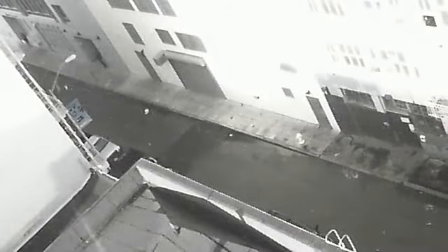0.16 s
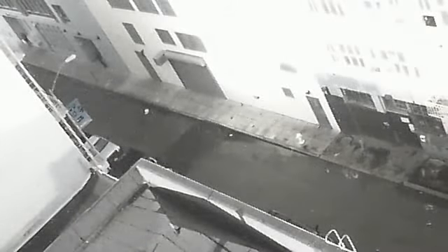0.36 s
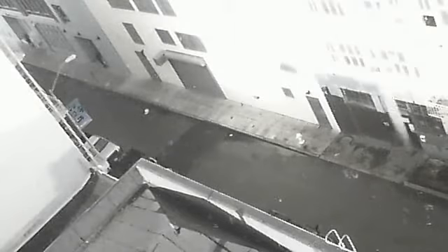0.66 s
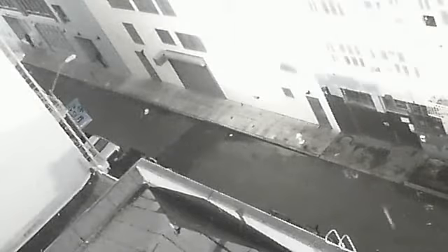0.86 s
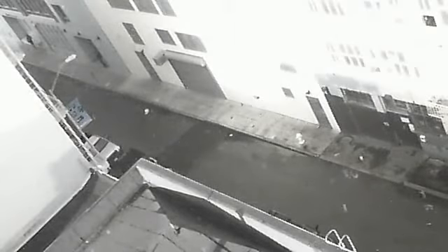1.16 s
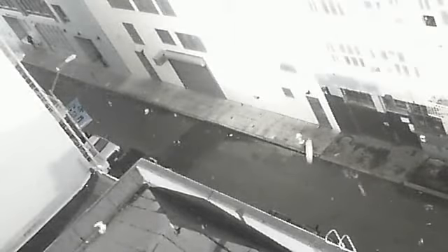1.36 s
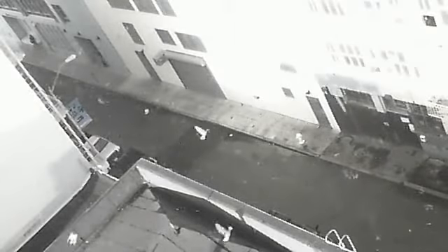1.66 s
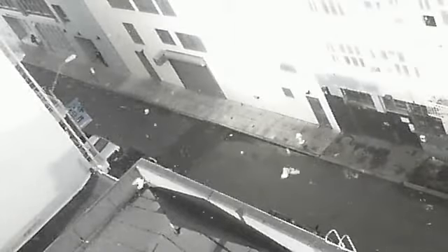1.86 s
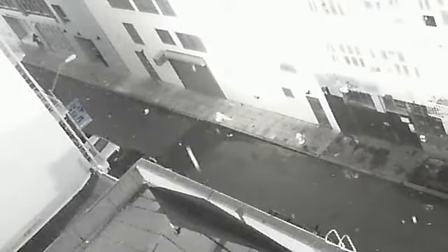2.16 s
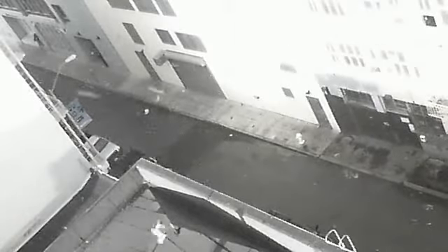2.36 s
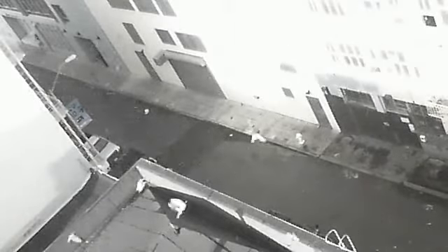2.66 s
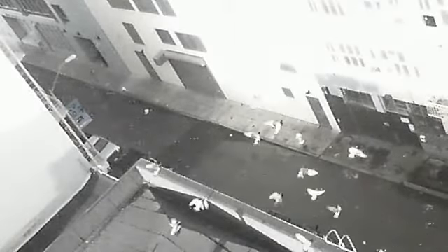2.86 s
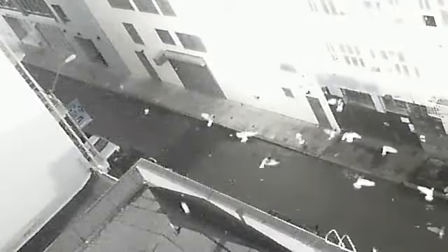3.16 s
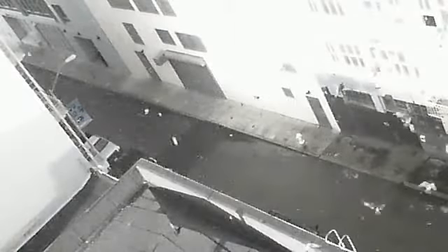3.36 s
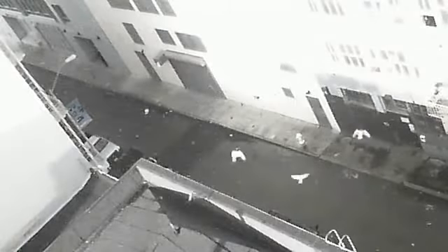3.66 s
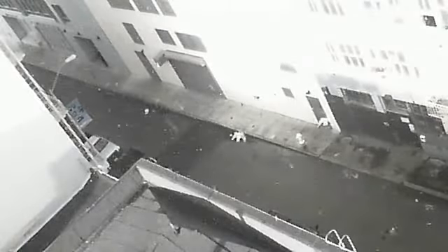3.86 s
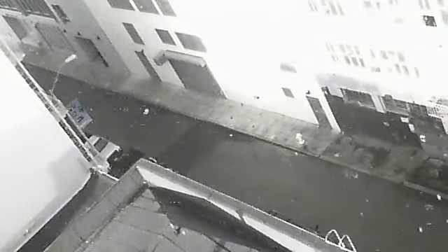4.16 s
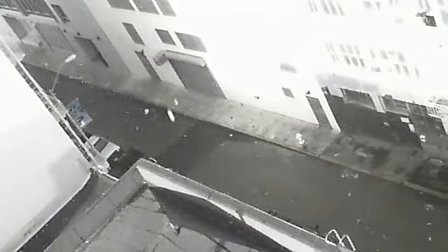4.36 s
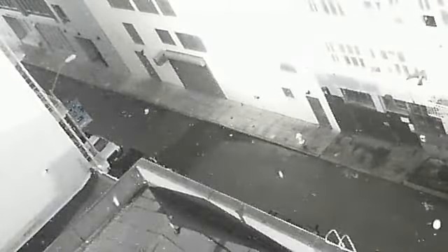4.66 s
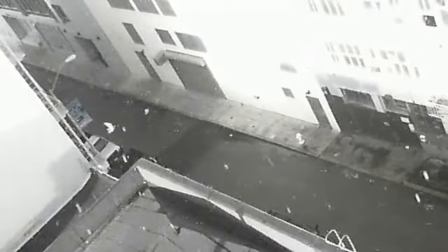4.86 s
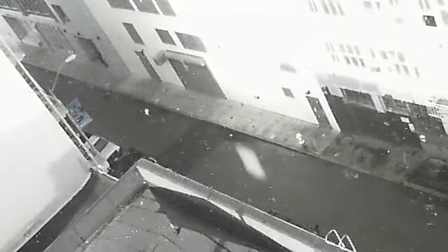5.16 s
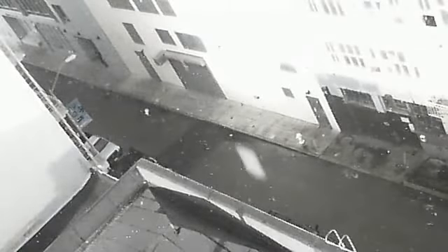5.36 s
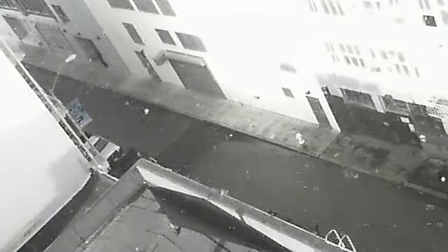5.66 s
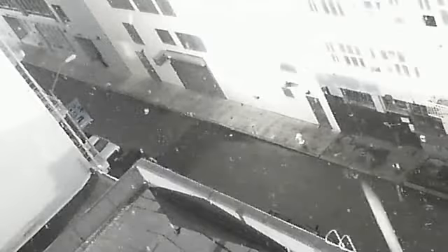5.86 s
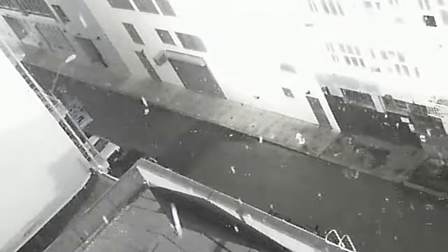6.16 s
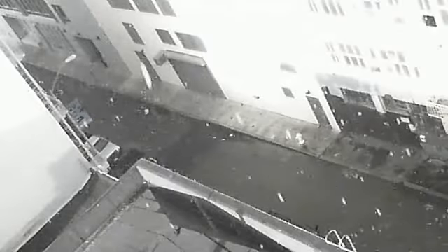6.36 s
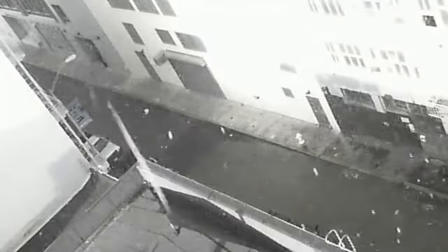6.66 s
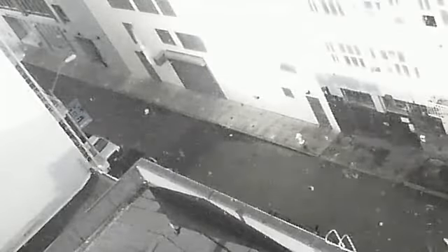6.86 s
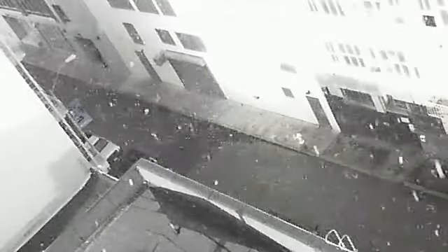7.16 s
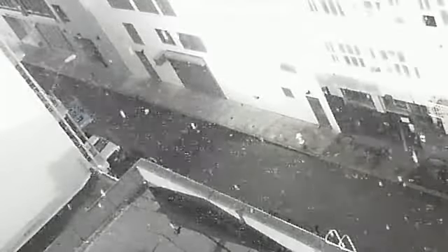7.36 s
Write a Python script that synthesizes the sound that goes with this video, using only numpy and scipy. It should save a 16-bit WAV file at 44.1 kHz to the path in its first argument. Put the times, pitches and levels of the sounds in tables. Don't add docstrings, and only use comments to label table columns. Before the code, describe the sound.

Hail hisses over a street and flat roof while close stones crack, tick and tap on a ledge, thickening as wind buffets the microphone.

```python
import sys
import numpy as np
from scipy import signal
from scipy.fft import rfft, irfft, dct, next_fast_len
from scipy.io import wavfile
from scipy.ndimage import uniform_filter1d

SR = 44100
rng = np.random.default_rng(int(sys.argv[2]) if len(sys.argv) > 2 else 0)


def volts(x):
    e = np.asarray(x, float) / 20
    return 10 ** e


def to_wav(sig):
    pcm = np.clip(np.atleast_2d(sig), -1, 1) * 32767
    pcm = np.round(pcm).astype(np.int16)
    wavfile.write(sys.argv[1], SR, pcm.T)


N = 331191
SECONDS = np.arange(N) / SR
SIZE = next_fast_len(N)
HZ = np.arange(1, SIZE // 2 + 2) * SR / SIZE
BANDS = np.geomspace(180, 10000, 18)
HEAVY_MEAN_DB = -36
SNAP_T60 = .0035
CUTOFF_HZ = 10340


def rms_one(x):
    return x / np.sqrt(np.mean(x ** 2) + 1e-20)


def noise_spectrum(points):
    hz, level_db = np.transpose(points)
    colour_db = np.interp(np.log(HZ), np.log(hz), level_db, left=-90, right=-90)
    return rfft(rng.standard_normal(SIZE)) * volts(colour_db)


def noise_bands(points):
    spectrum = noise_spectrum(points)
    place = np.interp(np.log(HZ), np.log(BANDS), np.arange(len(BANDS)))
    weights = (np.clip(1 - abs(place - k), 0, 1) for k in range(len(BANDS)))
    return np.array([irfft(spectrum * weight, SIZE)[:N] for weight in weights])


def band_rms(bands, low_hz, high_hz):
    return np.std(bands[(BANDS > low_hz) & (BANDS < high_hz)].sum(axis=0))


def drift(rate, count):
    pole = np.exp(-80 * np.pi * rate / SR)
    chance = rng.standard_normal((count, N // 40 + 2002))
    slow = signal.lfilter([1], [1, -2 * pole, pole * pole], chance)[:, 2000:]
    return np.array([np.interp(np.arange(N) / 40, np.arange(len(row)), rms_one(row)) for row in slow])


def evened(x, span_s):
    power = uniform_filter1d(x ** 2, int(span_s * SR))
    return rms_one(x / np.sqrt(power + 0.16 * np.mean(x ** 2)))


def shatter(bands, starts_s, band_db, t60, rise_s, plateau):
    out = np.zeros(N + 4000)
    for s, gains, ring_s in zip(starts_s, volts(band_db), np.clip(t60, .008, .15)):
        at = max(round((s - rise_s / 2) * SR), 0)
        age = np.arange(int(ring_s * 25000)) / SR
        decay = volts(-60 * np.maximum(age / ring_s - plateau, 0))
        shape = np.minimum(age / rise_s, 1) * decay
        out[at:at + len(age)] += shape * (gains @ bands[:, at:at + len(age)])
    return out[:N]


def ring_modes(blows, length_s):
    out = np.zeros(N + SR)
    age = np.arange(int(length_s * SR)) / SR
    for s, level_db, hz, t60 in blows:
        swell = 1 - np.exp(-age * hz / 1.5)
        mode = swell * np.sin(2 * np.pi * hz * age)
        out[round(s * SR):][:len(age)] += volts(level_db - 60 * age / t60) * mode
    return out[:N]


def ledge_stones(bands, stones, middle_db, thud_db, snap_db, debris_db, stretch, plateau, uneven_db):
    s, peak_db, hz, t60 = np.transpose(stones)
    octaves = np.log2(BANDS / hz[:, None])
    crack_db = 1.2 - 11 * np.minimum(octaves ** 2, .45)
    lower_db = np.where(BANDS > 2400, middle_db + 11.0, thud_db + 4.5)
    colour_db = np.where(BANDS > 5000, crack_db, lower_db) - 8 * (BANDS < 450)
    colour_db = colour_db + uneven_db * rng.standard_normal(colour_db.shape)
    ring = ring_modes(np.transpose([s, peak_db - 11.0, hz, t60]), length_s=0.056)
    snaps = np.transpose([s + .0006, peak_db + snap_db, hz, SNAP_T60 + 0 * s])
    snap = ring_modes(snaps, length_s=.006)
    debris_level_db = peak_db[:, None] + debris_db + colour_db
    debris = shatter(bands, s, debris_level_db, stretch * t60, rise_s=0.0018, plateau=plateau)
    return snap + ring + debris


# t/s, small stones level/dB, heavy stones level/dB
STORM = [(0, -35.5, -37), (.7, -35, -38), (1.5, -33.4, -38), (2.7, -33.5, -37), (3.4, -32, -37),
         (3.8, -31.5, -36.5), (4.3, -32, -35), (4.9, -31, -34), (5.6, -31, -34.5), (6, -30, -34),
         (6.7, -30, -34), (7.2, -30, -34.5), (7.51, -30.5, -33)]


def storm_db(s, column):
    return np.interp(s, *np.transpose(STORM)[[0, column]])


# f/Hz, level/dB per Hz
HAIL = [(94, -48.5), (160, -11), (357, -10), (656, -1), (980, 1), (1250, -3), (1490, -2.5), (2180, -8.5),
        (3560, -12), (4160, -9), (5310, -10), (6900, -3), (7660, -2.5), (9120, -4.5), (10300, -13),
        (13400, -40), (22000, -120)]


def far_hail(patchy_db, together_db):
    bands = noise_bands(HAIL)
    flicker_db = patchy_db * drift(12.7, count=len(BANDS)) + together_db * drift(9.3, count=1)
    small_db, heavy_db = storm_db(SECONDS, 1), storm_db(SECONDS, 2)
    swing_db = heavy_db - HEAVY_MEAN_DB
    # level/dB, centre/Hz, lower and upper edge/Hz
    surfaces = [(small_db, 6000, 4000, 11000),
                (heavy_db, 1300, 900, 2500),
                (HEAVY_MEAN_DB - 6 + 0.78 * swing_db, 680, 500, 900),
                (HEAVY_MEAN_DB - 9.5 + .7 * swing_db, 350, 200, 500)]
    centres = np.log([350, 680, 1300, 6000])
    level = 0
    for level_db, centre_hz, low_hz, high_hz in surfaces:
        own = np.isclose(centres, np.log(centre_hz)).astype(float)
        share = np.interp(np.log(BANDS), centres, own)[:, None]
        level = level + share * volts(level_db) / band_rms(bands, low_hz, high_hz)
    return (bands * level * volts(flicker_db)).sum(axis=0)


def roof_stones(bands, count, size_db):
    when, size, pitch, ring = rng.random((count, 4)).T
    s = when * (N / SR - .01)
    centre_hz = 700 * (11000 / 700) ** pitch
    colour_db = -12 * np.log2(BANDS / centre_hz[:, None]) ** 2
    level_db = storm_db(s, 1) - 7 - size_db * np.log(1 - .97 * size)
    return shatter(bands, s, level_db[:, None] + colour_db, 0.013 + .025 * ring, rise_s=.005, plateau=.3)


def pings(count, size_db):
    when, size, pitch, ring = rng.random((count, 4)).T
    s = when * N / SR
    hz = 650 * (10000 / 650) ** pitch
    colour_hz, density_db = np.transpose(HAIL)
    colour_db = np.interp(np.log(hz), np.log(colour_hz), density_db)
    level_db = storm_db(s, 1) + colour_db - 2.5 - size_db * np.log(1 - .95 * size)
    return ring_modes(np.transpose([s, level_db, hz, .03 + 0.064 * ring]), length_s=0.024)


def car_roofs(count, centre_hz, growth):
    when, size, pitch, ring = rng.random((count, 4)).T
    s = when * N / SR
    level_db = -43.0 + growth * (storm_db(s, 2) - HEAVY_MEAN_DB) - 3.6 * np.log(1 - .95 * size)
    hz = centre_hz * (.91 + .18 * pitch)
    return ring_modes(np.transpose([s, level_db, hz, 0.091 + 0.066 * ring]), length_s=0.022)


def crackle(count, size_db):
    when, size, pitch = rng.random((count, 3)).T
    s = when ** 0.64 * (N / SR - .01)
    level_db = storm_db(s, 1) + 7.4 - size_db * np.log(1 - .95 * size)
    return ring_modes(np.transpose([s, level_db, 5500 + 4000 * pitch, SNAP_T60 + 0 * s]), length_s=.006)


# t/s, deep push level/dB, flutter level/dB, length/s
EDDIES = [(0.492, -30, -42, 0.055), (0.763, -32.5, -35.5, 0.13), (.906, -32, -44, .05),
          (0.596, -33, -42, .04), (.17, -60, -54, 0.036), (1.078, -40, -46, 0.036), (2.305, -41, -52, .06),
          (4.71, -38, -37, 0.062), (0.965, -50, -36.5, 0.075), (1.04, -31.5, -47, .1),
          (1.39, -32, -60, 0.04), (1.568, -30.5, -55, 0.067), (2.13, -42, -47, 0.089),
          (2.847, -31, -35, 0.078), (3.027, -35, -38.5, 0.059), (3.192, -52, -36, 0.12),
          (3.353, -43, -34.5, 0.055), (3.403, -32, -40, 0.028), (3.485, -33, -35, 0.1),
          (3.617, -23.5, -28, 0.035), (3.95, -37, -36, .07), (4.26, -31, -42, 0.043),
          (3.735, -30, -27.5, 0.024), (3.802, -26.5, -27.5, 0.043), (3.87, -26, -42, .03),
          (6.65, -42, -38, .06), (2.66, -40, -44, .06), (3.72, -40, -34, .02), (3.69, -31, -42, 0.035),
          (4.046, -23, -34, 0.042), (4.095, -45, -32, 0.032), (4.18, -28, -37, 0.045),
          (4.58, -31, -41.5, 0.074), (5.122, -45, -44.5, .08), (5.353, -37, -54, .08),
          (5.672, -48, -39.5, 0.11), (5.92, -40, -50, .05), (6.546, -39, -40, .06),
          (6.763, -33, -37, 0.073), (6.845, -45, -36.5, 0.11), (7.016, -26, -28, .04),
          (7.087, -27, -32, 0.049), (7.13, -31, -34, .05), (6.97, -29, -40, .04), (7.272, -22, -31, 0.049),
          (7.36, -42, -32.5, 0.091), (7.48, -28, -28, 0.056)]


def eddies():
    t, out = np.arange(0, N + 64, 64) / SR, 0
    for s, deep_db, flutter_db, length_s in EDDIES:
        power = volts(2 * np.array([[deep_db], [flutter_db]]))
        out = out + power * np.exp(-(2 * (t - s) / length_s) ** 2)
    return np.array([np.interp(SECONDS, t, row) for row in out])


# t/s, level/dB
WIND = [(0, -52), (.33, -53), (.5, -35), (.95, -38.5), (1.25, -43.5), (1.6, -40), (2.0, -48), (2.5, -43),
        (2.85, -36), (3.7, -36.5), (4.3, -39.5), (4.6, -34.5), (5.1, -37.5), (5.6, -51), (6.1, -42),
        (6.5, -35), (6.9, -36.5), (7.2, -29), ]
# f/Hz, level/dB per Hz
BUFFET = [(6, 1.5), (20, 4.5), (40, 3.5), (60, -11.5), (85, -25.5), (130, -43)]
# f/Hz, level/dB per Hz
FLUTTER = [(40, -41.5), (60, 3.5), (90, -4), (130, -8.5), (180, -25.5), (300, -27)]


def wind(lumpy_db):
    wind_db = np.interp(SECONDS, *np.transpose(WIND))
    flutter_db = -49.5 + 0.41 * (wind_db + 41)
    steady_power = volts(2 * np.array([wind_db, flutter_db]))
    deep_gain, flutter_gain = np.sqrt(steady_power + eddies())
    lumps = volts(lumpy_db * drift(22, count=1)[0])
    deep = evened(irfft(noise_spectrum(BUFFET), SIZE)[:N], span_s=0.045)
    flutter = rms_one(lumps * evened(irfft(noise_spectrum(FLUTTER), SIZE)[:N], span_s=0.042))
    return deep_gain * deep + flutter_gain * flutter


# t/s, peak level/dB, brightest f/Hz, t60/s
SOLID = [(0.052, -15.5, 7800, 0.04), (0.563, -18.5, 8640, 0.065), (2.06, -19, 7530, 0.034),
         (2.513, -22, 7900, 0.065), (3.2738, -17.5, 9700, .049), (3.318, -17, 9600, 0.054),
         (3.666, -18, 7310, 0.043), (3.728, -14, 7350, .05), (5.1607, -12.5, 7200, 0.025),
         (5.2013, -28, 8700, 0.052), (5.5586, -15, 6790, 0.034), (5.654, -11, 7470, 0.025),
         (5.77, -15.5, 7460, 0.033), (5.886, -20, 7680, 0.035), (6.0314, -13, 7900, .03),
         (6.157, -15, 6820, 0.077), (6.1913, -18, 7720, 0.044), (6.273, -15.5, 8800, 0.023),
         (6.3794, -15, 7850, 0.031), (6.4067, -13.5, 9640, 0.031), (6.497, -16.5, 7300, 0.037),
         (6.64, -16, 6040, 0.025), (6.7874, -13.5, 8350, 0.03), (6.8184, -19, 8200, 0.046),
         (7.01, -21, 7450, .04), (7.067, -13.5, 7070, 0.11), (7.104, -14, 8530, 0.035),
         (7.31, -13.5, 7630, 0.021), (7.386, -9, 7900, 0.029), (7.428, -13.5, 8140, 0.055)]


def solid_stones(bands):
    return ledge_stones(bands, SOLID, middle_db=-16.5, thud_db=-3.5, snap_db=-6, debris_db=-14,
                        stretch=1.38, plateau=0.08, uneven_db=0.8)


# t/s, peak level/dB
SNAPS = [(0.657, -10), (2.099, -9.5), (3.605, -12), (3.7288, -9), (4.9854, -17), (5.163, -12),
         (5.2215, -18), (5.7704, -24), (5.8293, -16), (5.9914, -11), (6.1605, -13), (6.192, -10),
         (6.1974, -16), (6.379, -22), (6.4162, -11), (6.7886, -9), (6.856, -13), (6.864, -12), (7.073, -14),
         (7.3831, -14), (.0545, -19), (1.0287, -20), (1.2953, -18), (1.649, -16), (1.9978, -16),
         (3.3155, -13), (3.5343, -15), (4.2225, -20), (4.751, -16), (4.8478, -16.5), (5.2308, -13),
         (5.3227, -18), (5.839, -13), (6.4221, -14), (7.0112, -16), (5.6562, -12)]


def bright_ticks(hz, t60, boost_db):
    s, peak_db = np.transpose(SNAPS)
    pitch = hz * rng.uniform(0.86, 1.15, len(s))
    out = 0
    for ratio, db in ((0.99, 3.5), (0.37, -6), (0.2, -15)):
        ticks = np.transpose([s, peak_db + boost_db + db, ratio * pitch, t60 + 0 * s])
        out = out + ring_modes(ticks, length_s=.006)
    return out


# t/s, level/dB, f/Hz, t60/s
TAPS = [(.109, -30.5, 2550, 0.027), (.4702, -27, 1680, .03), (2.2658, -25.5, 1780, .03),
        (3.5645, -27, 1800, .03), (4.757, -25, 1700, .03), (5.4595, -23, 1600, .03),
        (5.7695, -19.5, 1580, 0.028), (5.7702, -24, 2750, 0.02), (5.911, -23, 1600, .03),
        (6.0322, -15.5, 7660, 0.041), (6.037, -20.5, 1800, 0.022), (6.4068, -20, 1083, 0.037),
        (6.4135, -23, 2300, .03), (6.4168, -16.5, 1470, .025), (6.417, -16, 680, 0.028),
        (6.447, -24, 1500, .06), (6.4665, -20, 990, .04), (6.858, -20, 1310, .03),
        (7.1055, -16, 1413, 0.036), (7.3205, -22, 1500, .03), (4.9845, -21, 1750, 0.028),
        (7.1055, -14, 8520, .04), (6.0335, -18, 9800, .03), (6.031, -22.5, 4090, 0.043),
        (6.788, -18, 1000, .035), (7.3835, -15, 9200, 0.02), (7.384, -20, 7500, .03)]


def hollow_taps():
    return ring_modes(TAPS, length_s=.04)


# t/s, peak level/dB, brightest f/Hz, t60/s
BRITTLE = [(0.11, -16.5, 7140, 0.018), (0.6555, -15.5, 8150, 0.033), (1.6486, -14, 7200, .036),
           (1.7873, -17, 7160, .025), (2.099, -12, 9680, .07), (2.979, -11, 7900, 0.033),
           (3.025, -19.5, 7260, 0.032), (3.534, -17.5, 7500, 0.03), (3.605, -18.5, 7800, 0.037),
           (3.9584, -16, 6300, 0.064), (4.18, -18, 9000, 0.026), (4.211, -16, 9130, 0.094),
           (4.7486, -14.5, 6830, 0.057), (4.874, -12, 9500, 0.091), (4.893, -16, 7150, 0.033),
           (5.2205, -12.5, 7400, 0.028), (5.2844, -23, 6980, 0.029), (5.323, -14.5, 7070, 0.041),
           (5.3547, -19, 7540, .053), (5.5095, -13, 7900, 0.027), (5.8305, -8.5, 7530, 0.031),
           (5.988, -13, 7600, .04), (6.116, -15, 8900, 0.044), (6.3006, -14, 6820, 0.017),
           (6.593, -10, 8200, 0.02), (6.6237, -22, 7120, .019), (6.7057, -12.5, 8920, .035),
           (6.7346, -22, 7450, 0.12), (6.8603, -7, 9000, 0.02), (7.1881, -16, 9050, 0.066)]


def brittle_stones(bands):
    return ledge_stones(bands, BRITTLE, middle_db=-16, thud_db=-14.5, snap_db=-4.5, debris_db=-17,
                        stretch=1.2, plateau=0.17, uneven_db=1.9)


# centre t/s, middle level/dB, top level/dB, length/s
BURSTS = [(0.123, -34, -32.5, .006), (0.178, -30, -30, 0.0081), (0.67, -38, -46, .008),
          (1.942, -40, -31, .005), (2.102, -32, -32, .008), (2.523, -28, -31, 0.009),
          (2.972, -30, -34, 0.0072), (3.027, -40, -28, 0.0067), (3.325, -30.5, -28, 0.009),
          (3.931, -36, -29.5, 0.0045), (4.752, -26, -30, .008), (4.766, -31, -26.5, 0.0043),
          (4.88, -30, -28, .007), (4.984, -28, -31, .005), (5.222, -33, -22, .007),
          (5.228, -27, -32, 0.0049), (5.322, -24.5, -29.5, 0.0059), (5.531, -32, -27, .005),
          (5.652, -29, -26, 0.002), (5.774, -21, -29, 0.0043), (5.831, -32, -24, 0.0054),
          (6.035, -22.5, -22, .008), (6.159, -26, -26, .005), (6.38, -25, -26.5, 0.0032),
          (6.411, -26, -28, 0.0056), (6.419, -23, -25, .004), (6.647, -29, -23, 0.0064),
          (6.714, -24, -25.5, 0.0066), (6.79, -24, -19, 0.0044), (6.866, -27, -20.5, .005),
          (6.954, -26, -34, .006), (7.108, -19, -19, .008), (7.192, -27, -24, .005),
          (7.201, -33, -25, .005), (7.25, -29, -32, .006), (7.385, -22.5, -22, 0.0051)]


def bursts(bands):
    out = np.zeros(N)
    for s, middle_db, top_db, length_s in BURSTS:
        lower_db = np.where(BANDS > 1900, middle_db, middle_db - 10.5)
        gains = volts(np.where(BANDS > 5500, top_db, lower_db)) * (BANDS > 500)
        age = np.arange(int(1.5 * np.clip(length_s, .002, .02) * SR)) / SR
        puff = np.minimum(age / .001, 1) * np.cos(np.pi / 2 * age / age[-1])
        at = round((s - .45 * length_s) * SR)
        grain = bands[:, at + 2000:at + 2000 + len(puff)]
        out[at:at + len(puff)] += puff * (gains @ grain)
    return out


# t/s, level/dB, centre f/Hz, t60/s
THUDS = [(4.15, -34, 1100, .14), (4.3, -33, 1100, .14), (7.38, -29, 530, .12), (5.7, -32, 1100, .12),
         (6.31, -29, 6200, .03), (.668, -28, 1000, 0.034), (2.987, -30, 950, 0.042), (4.215, -31, 1000, .1),
         (5.1, -36, 1050, .12), (5.204, -30, 1060, .05), (6.19, -32, 1170, 0.037), (6.64, -32, 1100, 0.036),
         (0.49, -31, 1600, 0.034), (6.787, -23.5, 1200, 0.042), (2.04, -33, 1900, 0.07),
         (2.95, -28.5, 2980, 0.18), (.17, -29, 1400, 0.11), (4.071, -25.5, 720, 0.11),
         (4.744, -23, 1790, 0.042), (4.745, -39, 696, 0.1), (4.982, -24, 1800, 0.03), (5.05, -38, 380, .12),
         (5.624, -23, 330, 0.17), (5.65, -27, 220, 0.16), (6.031, -24, 297, 0.17),
         (6.415, -25.5, 1400, 0.12), (5.767, -34, 2500, 0.033), (6.027, -32, 4600, 0.038),
         (6.8567, -22, 7600, 0.018), (6.863, -19.5, 320, 0.088), (6.907, -25, 1100, 0.051),
         (7.102, -30, 610, 0.12), (7.12, -28, 3970, 0.029), (7.19, -45, 1650, .1),
         (7.306, -36, 1000, 0.058)]


def ledge_thuds(bands):
    s, level_db, hz, t60 = np.transpose(THUDS)
    colour_db = -14 * np.log2(BANDS / hz[:, None]) ** 2
    return shatter(bands, s, level_db[:, None] + colour_db, t60, rise_s=0.00095, plateau=0.13)


# centre t/s, lower f/Hz, upper f/Hz, level/dB
SIDE_NOISE = [
    (.301, 4100, 5300, -51),
    (2.9485, 6800, 8400, -39),
    (3.481, 5600, 7000, -42),
    (4.574, 8200, 9800, -41),
    (6.989, 4100, 5800, -43),
]


def side_noise():
    out, hz = np.zeros(N), np.arange(1025) * SR / 2048
    for s, low_hz, high_hz, level_db in SIDE_NOISE:
        spectrum = rfft(rng.standard_normal(2048))
        noise = rms_one(irfft(spectrum * (hz > low_hz) * (hz < high_hz)))
        out[round(s * SR) - 1024:][:2048] += volts(level_db) * np.sqrt(np.hanning(2048)) * noise
    return out


# t/s, level/dB, f/Hz, t60/s
KNOCKS = [(.535, -36, 739, 0.66), (.59, -34.5, 700, 0.51), (.57, -45.5, 338, 1.8), (.65, -43, 345, 1),
          (.72, -44, 343.7, 1.1), (.96, -45.5, 339.6, 1.7), (1.25, -39, 695, 0.73), (1.45, -44, 660, 0.45),
          (3.99, -34, 2870, 0.087), (3.99, -29, 3950, 0.073), (4.07, -26, 627, 0.064),
          (4.745, -24, 670, 0.1), (4.745, -29, 1666, 0.092), (4.98, -28, 1780, .05),
          (5.05, -27.5, 461, 0.093), (5.05, -30.5, 296, 0.15), (5.219, -24.5, 1030, 0.088),
          (5.635, -29, 410, 0.11), (5.655, -27.5, 132, 0.12), (5.649, -33, 309, 0.14),
          (6.03, -27, 273, 0.072), (6.115, -31, 1220, 0.14), (6.42, -31, 1520, 0.13),
          (6.405, -36, 2040, .1), (6.641, -32, 4530, .2), (6.86, -20, 1290, 0.057),
          (7.19, -25.5, 1590, 0.13), (7.387, -15, 1650, 0.037)]


def sheet_metal():
    return ring_modes(KNOCKS, length_s=0.9)


# t/s, peak level/dB, brightest f/Hz
GLANCING = [(.5513, -28, 7780), (1.293, -30, 8100), (1.9974, -24, 7760), (2.9638, -20.5, 4570),
            (3.1804, -19, 7120), (3.929, -21, 7630), (4.4238, -24, 7310), (4.659, -31, 7030),
            (4.71, -29, 6800), (4.762, -18.5, 6500), (4.791, -17, 7440), (4.9751, -22.5, 6890),
            (5.233, -13.5, 9000), (5.6087, -24, 6950), (5.9429, -22, 7220), (6.0132, -22, 8290),
            (6.2506, -14, 7200), (6.3325, -21, 9500), (6.8877, -23, 8340), (6.9541, -28, 7660),
            (6.999, -19, 8150), (7.148, -20, 9140), (7.1656, -23, 7920), (7.257, -23, 7730)]


def glancing_stones(bands):
    stones = [(*row, .04) for row in GLANCING]
    return ledge_stones(bands, stones, middle_db=-14.5, thud_db=-9, snap_db=-0.5, debris_db=-16,
                        stretch=0.46, plateau=0.7, uneven_db=2.0)


def scene():
    debris = noise_bands(HAIL)
    debris = np.pad(debris / band_rms(debris, 4000, 11000), ((0, 0), (0, 4000)))
    mono = far_hail(patchy_db=0.81, together_db=.5)
    mono = mono + roof_stones(debris, count=450, size_db=2.0) + pings(count=800, size_db=1.5)
    mono = mono + car_roofs(count=500, centre_hz=1063.5, growth=2.2) + crackle(count=500, size_db=3.5)
    mono = mono + wind(lumpy_db=2.0)
    mono = mono + solid_stones(debris) + bright_ticks(hz=7900, t60=0.0032, boost_db=1.0)
    mono = mono + hollow_taps() + brittle_stones(debris) + bursts(debris)
    mono = mono + ledge_thuds(debris) + sheet_metal() + glancing_stones(debris)
    return np.array([mono, mono])


# f/Hz, step level/dB
STEPS = [(300, -60), (1500, -42), (3000, -31.5), (5500, -28), (7500, -25), (10000, -27)]


def coarse_rounding(x, attack_db):
    hop = 1152
    window = np.sin(np.pi * (np.arange(2 * hop) + .5) / (2 * hop))
    padded = np.pad(x, (hop, 2 * hop - N % hop))
    blocks = np.lib.stride_tricks.sliding_window_view(padded, 2 * hop)[::hop]
    a, b, c, d = np.split(blocks * window, 4, axis=1)
    lines = dct(np.hstack([-c[:, ::-1] - d, a - b[:, ::-1]]), type=4, norm="ortho")
    hz = (np.arange(hop) + .5) * SR / (2 * hop)
    step_hz, step_db = np.transpose(STEPS)
    step = volts(np.interp(np.log(hz), np.log(step_hz), step_db))
    rounded = np.sign(lines) * step * np.floor(abs(lines) / step + .4) * (hz < CUTOFF_HZ)
    slope = np.diff(blocks, prepend=0).reshape(len(blocks), 12, -1)
    power = np.mean(slope[:, 2:10] ** 2, axis=2)
    steady = power.max(axis=1) < volts(2 * attack_db) * np.median(power, axis=1)
    error_lines = (rounded - lines) * steady[:, None]
    early, late = np.split(dct(error_lines, type=4, norm="ortho"), 2, axis=1)
    error = np.hstack([late, -late[:, ::-1], -early[:, ::-1], -early]) * window
    return x + (error[1:, :hop] + error[:-1, hop:]).ravel()[:N]


def top_cut(x):
    return signal.sosfilt(signal.butter(12, 10960, fs=SR, output="sos"), x)


def record(dry):
    rounded = .33 * np.tanh(dry[0] / .33)
    short_filter = signal.firwin(257, CUTOFF_HZ + 80, window="boxcar", fs=SR)
    cut = signal.fftconvolve(rounded, short_filter, "same")
    cut = signal.sosfilt(signal.ellip(10, .2, 70, CUTOFF_HZ + 950, fs=SR, output="sos"), cut)
    middle = coarse_rounding(cut, attack_db=4.2) - .0039
    mix = middle + side_noise() * [[1], [-1]]
    return top_cut(mix)


dry = scene()
out = record(dry)
to_wav(out)
```